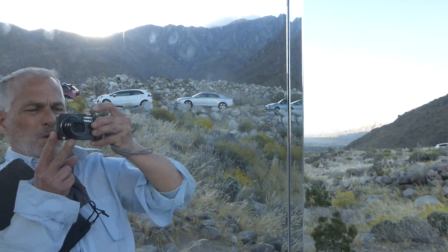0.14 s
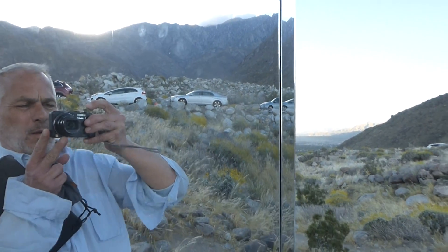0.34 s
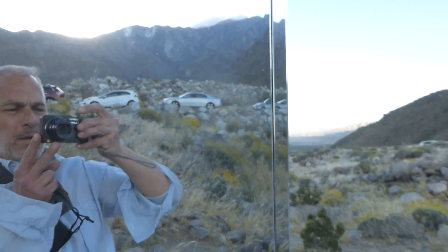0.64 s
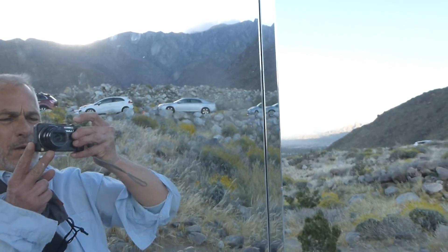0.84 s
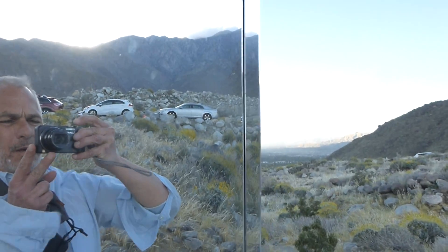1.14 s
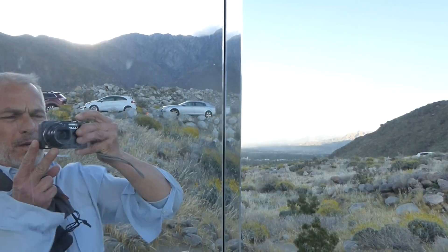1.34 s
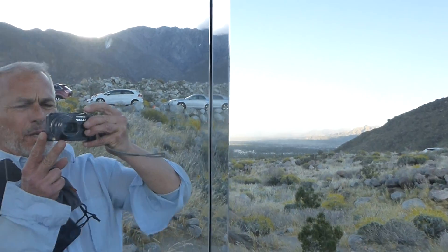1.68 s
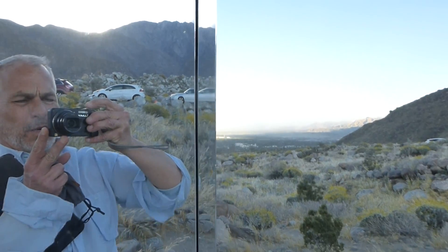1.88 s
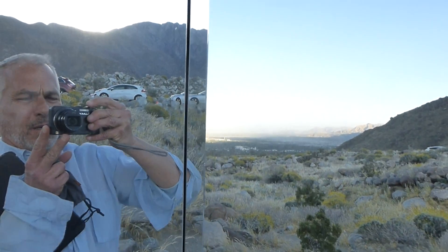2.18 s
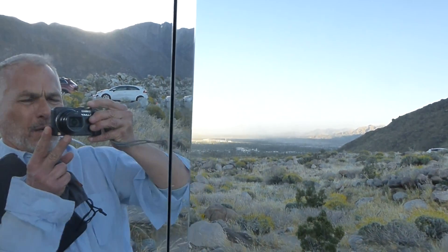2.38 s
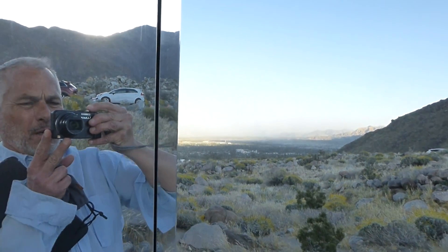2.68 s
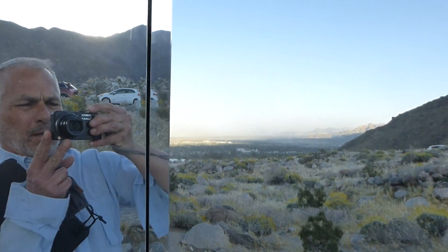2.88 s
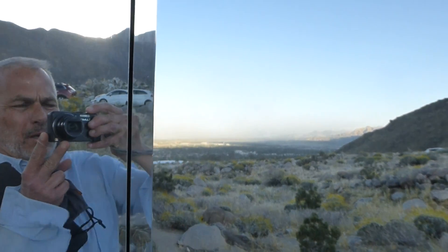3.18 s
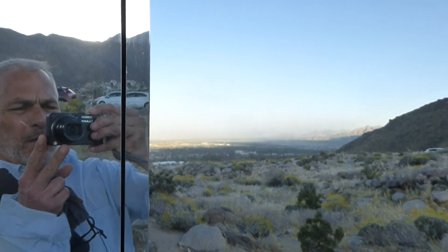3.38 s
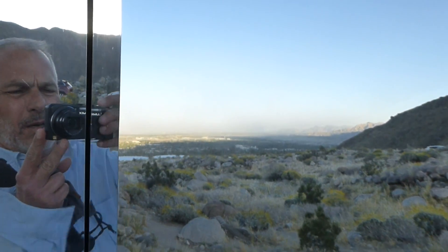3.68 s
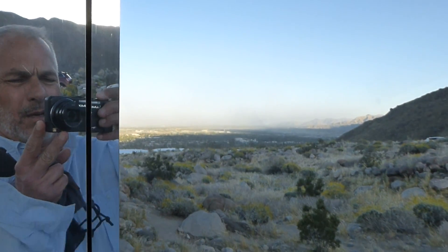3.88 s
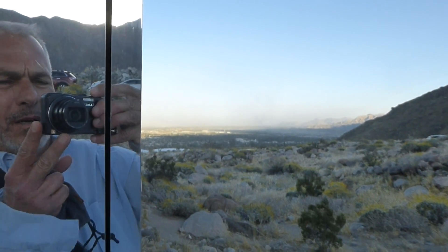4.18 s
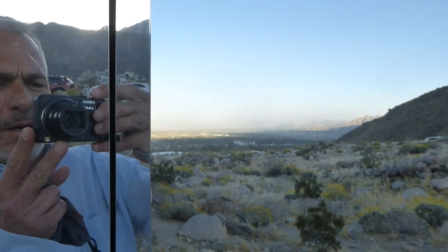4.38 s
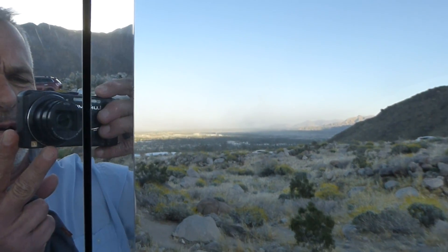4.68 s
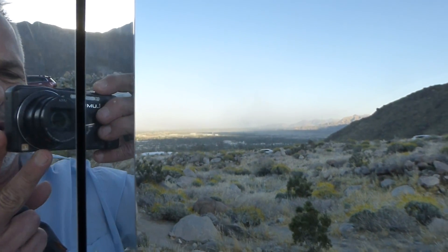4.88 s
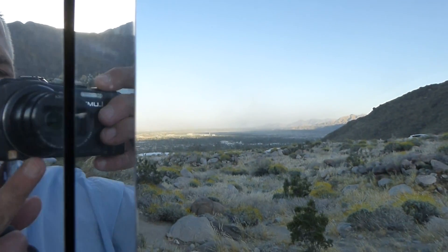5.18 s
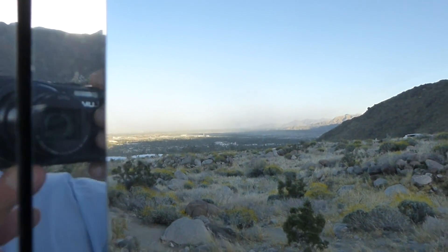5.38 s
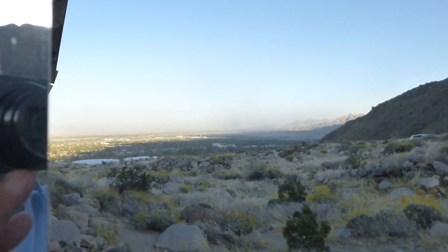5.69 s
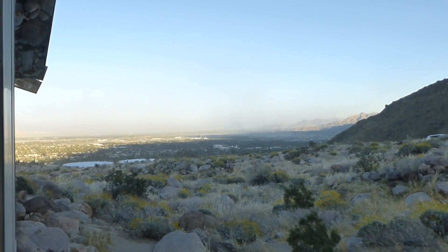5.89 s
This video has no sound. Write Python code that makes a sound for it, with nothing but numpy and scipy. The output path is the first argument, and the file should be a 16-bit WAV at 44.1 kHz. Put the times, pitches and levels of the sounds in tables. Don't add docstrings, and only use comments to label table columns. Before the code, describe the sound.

Strong wind blows over the tiny unshielded microphone of a hand-held camera in open desert hills. A rough continuous roar starts at once, loudest and full, then eases unevenly, turning dull near one second, brighter around one and a half and again past three. Short puffs, gaps and hissy flashes break it up, while low buffeting and dull thumps knock the microphone. Close, dry, no echo.

```python
import sys
import numpy as np
from scipy import signal
from scipy.io import wavfile
from scipy.ndimage import uniform_filter1d

SR = 44100
rng = np.random.default_rng(int(sys.argv[2]) if len(sys.argv) > 2 else 0)


def volts(x):
    e = np.asarray(x, float) / 20
    return 10 ** e


def unload_audio(sound):
    columns = np.transpose(np.atleast_2d(sound))
    steps = np.round(np.clip(columns, -1, 1) * 32767)
    wavfile.write(sys.argv[1], SR, steps.astype(np.int16))


N = 266584

# start_s, strength_db, brightness_db
AIR_STREAM = [(0.0, -21.5, -21), (0.67, -24.0, -27.5), (0.8, -25.5, -34.5), (0.96, -23.5, -25),
              (1.06, -26, -25), (1.49, -27.5, -16.5), (2.4, -24.5, -25.5), (2.59, -29.5, -33.5),
              (2.69, -28.0, -22.5), (3.21, -23.5, -14.5), (3.31, -27.5, -17.5), (3.47, -25.5, -14),
              (4.5, -27.5, -22), (4.6, -28, -33.5), (4.97, -26.5, -34.5), (5.16, -23.5, -23.5),
              (5.83, -29, -34), (6.04, -25.5, -34)]
# centre_s, length_s, strength_lift_db, brightness_lift_db, buffeting_lift_db
SWELLS_AND_LULLS = [(0.197, 0.11, -1.5, -2, -5), (0.358, 0.078, -1.5, -0.5, -2),
                    (1.117, 0.059, -0.5, -9, 3.5), (1.217, 0.04, -5, 1, 3), (1.402, 0.072, -0.5, -3.0, 0.5),
                    (1.46, 0.067, 2, -0.5, -4), (1.632, 0.031, 3.0, 1, -1), (1.844, 0.1, 0, 2, -8.0),
                    (2.09, 0.14, 0.5, -8, 1.5), (2.17, 0.053, -2.5, -1, -3), (2.456, 0.065, -2.5, 5.5, -1),
                    (2.667, 0.075, 5, -6, 4.5), (3.1, 0.032, 2.5, -4, 1.0), (4.002, 0.07, -1, -3, -5),
                    (4.321, 0.045, 0, -7, -1.5), (4.745, 0.12, 2.5, 8.5, -0.5),
                    (4.853, 0.049, 0.5, 6.5, -2.0), (4.914, 0.048, -4.5, -2.5, -6),
                    (5.216, 0.039, -3, 0, -1), (5.497, 0.071, -2.5, -3, -12), (5.647, 0.13, 4.5, 4.5, -5),
                    (5.75, 0.048, 2, -14.5, -4), (5.874, 0.045, -2, -6, -4), (5.926, 0.083, 7.5, -4, 3)]
# centre_s, length_s, strength_lift_db, brightness_lift_db
AIR_PUFFS = [(0.058, 0.03, 2.5, 2), (0.455, 0.03, 2.0, 1), (0.558, 0.02, 3.5, -5.5), (0.838, 0.056, 1.5, 2),
             (0.958, 0.024, 3.5, 4), (1.106, 0.008, 6.5, 3.5), (1.144, 0.0092, 7, 2.5),
             (1.19, 0.012, 6.5, -0.5), (1.245, 0.028, 1, 3.5), (1.356, 0.015, 3.5, 2.5),
             (1.438, 0.011, 5.5, -9), (1.517, 0.0093, 6, -2.5), (1.74, 0.038, 1.5, -3.5),
             (2.048, 0.015, 4.0, -1.0), (2.143, 0.0065, 4.0, -17), (2.32, 0.011, 1.5, -3),
             (2.347, 0.017, 3, 0), (2.39, 0.011, 2.5, -6.0), (2.689, 0.0088, 4.5, -2),
             (2.791, 0.011, 3, 3.5), (3.043, 0.011, 3, -6), (3.45, 0.011, 3.0, -3),
             (3.531, 0.018, 1.5, -3.5), (4.388, 0.036, 2.5, 0.0), (4.52, 0.023, 4, 0.5),
             (4.904, 0.015, 3, 8.0), (5.357, 0.022, -1, 8), (5.552, 0.012, 4.0, -6),
             (5.698, 0.011, 2.5, 2.5), (5.785, 0.028, 2.5, -2.5)]
# centre_s, length_s, strength_lift_db, brightness_lift_db
AIR_GAPS = [(0.138, 0.015, -2.5, 4), (0.674, 0.028, -2.5, 7), (0.709, 0.031, -0.5, -4),
            (0.727, 0.017, -1, 5), (1.123, 0.011, -6.0, 4), (1.376, 0.017, -5, 3.0),
            (1.538, 0.013, -7.5, 1), (1.672, 0.051, 0.0, -4.5), (1.765, 0.0097, -3.0, -5),
            (1.921, 0.018, -3, -0.5), (1.961, 0.02, -2.5, 1), (2.033, 0.031, -0.5, -6.5),
            (2.29, 0.018, -1, -3), (2.402, 0.011, -3.5, -9), (2.674, 0.0087, -1, -3.0),
            (3.183, 0.026, -3, 1), (3.261, 0.017, -3.5, 3), (3.403, 0.02, -1.5, -6), (4.61, 0.011, -3.5, 2),
            (4.658, 0.018, -7.5, 7), (4.96, 0.0096, -5, -3.5), (5.147, 0.011, -2.5, -4.5),
            (5.213, 0.0085, -13, -1.0), (5.377, 0.02, -4, 4), (5.42, 0.011, -1.5, 2.0),
            (5.447, 0.018, -3, 1.5), (5.623, 0.022, -3, 1), (5.723, 0.015, -5.5, 1),
            (5.816, 0.015, -2.5, -6), (5.94, 0.013, -8.5, 0)]
# centre_s, brightness_lift_db
TREBLE_FLASHES = [(0.62, 3), (1.095, 5), (1.165, 6), (1.404, 6), (1.48, 4), (1.976, 5), (2.093, 11),
                  (2.23, 6), (2.512, -6), (2.53, -6), (2.642, 12), (2.666, 9), (2.922, 0), (3.223, 6),
                  (3.841, 7), (4.002, 6), (4.557, -3), (4.633, 3), (4.789, 5), (4.945, -2), (4.979, 2),
                  (5.015, 9), (5.065, 4), (5.183, 8), (5.464, 5), (5.6, 2), (5.803, 6), (5.838, 2),
                  (5.909, 1), (5.962, 9)]
# frequency_hz, level_db (per Hz)
ROAR_SPECTRUM = [(150, 8.5), (300, 1), (600, -1.5), (1100, -1.5), (2000, -3), (3000, -8), (5000, -16.5),
                 (7000, -23.5), (10000, -34), (15000, -47.5), (24000, -80), (44000, -88), (90000, -115)]
# frequency_hz, gain_db
PORT_COLOUR = [(1000, 0), (4000, 0), (5200, 1), (6500, -1), (10000, 0), (15500, 4)]
# frequency_hz,
# level_db (under the roar)
DISTANT_RUSH = [(1500, -29), (3000, -26.5), (4200, -39), (5400, -64), (6500, -51), (9000, -75), (16000, -95)]
# frequency_hz, level_db (per Hz)
BUFFET_SPECTRUM = [(8, -50), (18, -34), (35, -35), (60, -5.5), (113, -2.5), (200, -7.5), (500, -10)]
# centre_s, peak_db, pitch_hz
BIG_THUMPS = [(0.141, -13, 213), (0.396, -15, 198), (0.597, -10, 141), (1.107, -9, 138), (1.147, -5, 175),
              (1.195, -11, 189), (1.367, -3.5, 149), (1.439, -8.5, 111), (1.483, -3, 218),
              (1.515, -13, 184), (1.642, -9, 190), (1.761, -9, 118), (1.902, -13, 188), (1.996, -15, 207),
              (2.143, -5, 247), (2.353, -11, 149), (2.459, -12.5, 171), (2.666, -6.5, 209),
              (2.787, -6.5, 224), (2.873, -11, 150), (3.448, -14, 158), (4.026, -13, 204),
              (4.416, -13, 130), (4.98, -10, 170), (5.112, -8.5, 148), (5.178, -8.5, 260),
              (5.439, -11, 229), (5.7, -14, 191), (5.756, -12.5, 240), (5.959, -14, 202)]

HOP = 64
USUAL_FIZZ_DB, FIZZ_DB_PER_OCTAVE = -22, 17.5


def roar():
    t = np.arange(N // HOP + 8) * HOP / SR
    hz = np.fft.rfftfreq(4 * HOP, 1 / SR)[:, None] + 1
    level_db, speed = wind(t)
    bass_cut_db = 16 * np.log10(1 + (240 / hz) ** 2)
    colour_db = read(ROAR_SPECTRUM, hz / speed) - bass_cut_db
    core = (hz[:, 0] > 400) & (hz[:, 0] < 1800)
    colour_db -= 10 * np.log10((volts(colour_db[core]) ** 2).sum(0))
    distant_power = volts(read(DISTANT_RUSH, hz)) ** 2
    colour_db = 10 * np.log10(volts(colour_db) ** 2 + distant_power)
    uneven_db = 0.47 * patches(colour_db.shape, bins=5, frames=12)
    field_db = colour_db + read(PORT_COLOUR, hz) + level_db + uneven_db
    return volts(0.74) * noise(field_db, size=4 * HOP)


def wind(t):
    s, strength_db, bright_db = np.transpose(AIR_STREAM)
    gusts = lifts(t, SWELLS_AND_LULLS, 1)[:2]
    gusts = gusts + lifts(t, AIR_PUFFS, 1.17) + lifts(t, AIR_GAPS, 1.1)
    strength_lift_db, bright_lift_db = gusts
    shared = flutter(t, 12, 200)
    level_db = np.interp(t, s, strength_db) + strength_lift_db
    level_db = level_db + 0.65 * flutter(t, 7.9, 120) + 0.99 * shared
    fizz_db = np.interp(t, s, bright_db) + bright_lift_db + 0.5 * shared - 1.17
    flashes = [(at, 0.0075, db) for at, db in TREBLE_FLASHES]
    fizz_db = fizz_db + lifts(t, flashes, 0.93)[0]
    snaps = rng.exponential(1, len(t)) * (rng.random(len(t)) < 0.2)
    fizz_db = fizz_db + 4.2 * uniform_filter1d(np.minimum(snaps, 2.4), size=2)
    return level_db, 2 ** ((fizz_db - USUAL_FIZZ_DB) / FIZZ_DB_PER_OCTAVE)


def buffeting():
    hz = np.fft.rfftfreq(2048, 1 / SR)[:, None] + 1
    colour_db = read(BUFFET_SPECTRUM, hz) - 17 * np.log10(1 + (hz / 300) ** 2)
    low = evened(noise(colour_db + np.zeros(N // 512 + 8), size=2048))
    t = np.arange(N) / SR
    s, strength_db, bright_db = np.transpose(AIR_STREAM)
    octaves = (bright_db - USUAL_FIZZ_DB + 1.5) / FIZZ_DB_PER_OCTAVE
    buffet_db = -24.0 + 0.54 * (strength_db + 26) - 5 * octaves ** 2
    slow_t = t[::HOP]
    lumps_db = 2.4 * flutter(slow_t, 8, 60) + 1.36 * lifts(slow_t, SWELLS_AND_LULLS, 0.97)[2]
    return low * volts(np.interp(t, s, buffet_db) + np.interp(t, slow_t, lumps_db) - 3.0)


def thumps():
    out = np.zeros(N + SR)
    when, size, pitch = rng.random(size=(40, 3)).T
    small_s = 0.05 + when * (N / SR - 0.05)
    small_db = -19.0 + 5 * (2 * size - 1)
    small_hz = 90.0 * (260.0 / 90.0) ** pitch
    eddies = [*BIG_THUMPS, *np.transpose([small_s, small_db, small_hz])]
    for (at, peak_db, hz), phase in zip(eddies, rng.random(len(eddies))):
        half = int(1.6 * SR / hz)
        turns = np.arange(-half, half) * hz / SR
        fade = np.exp(-(turns / 0.52) ** 2) * np.hanning(len(turns))
        push = np.cos(2 * np.pi * (turns + phase)) * fade
        start = round(at * SR) - half
        out[start:start + len(push)] += volts(peak_db - 4.0) * push
    return out[:N]


def lifts(t, events, depth):
    at, length, *columns = np.transpose(events)
    bumps = np.exp(-(2 * (t - at[:, None]) / length[:, None]) ** 4)
    return depth * np.array(columns) @ bumps


def flutter(t, low_hz, high_hz):
    hz = np.geomspace(low_hz, high_hz, num=60)[:, None]
    waves = np.sin(2 * np.pi * (hz * t + rng.random(hz.shape)))
    return evened((waves * hz ** -0.15).sum(0))


def patches(shape, bins, frames):
    field = rng.standard_normal(shape[::-1]).T
    field = uniform_filter1d(field, bins, axis=0)
    return evened(uniform_filter1d(field, frames, axis=1))


def noise(field_db, size):
    a, b = rng.standard_normal(field_db.T.shape + (2,)).T
    spectra = volts(field_db) * (a + 1j * b)
    return signal.istft(spectra, nperseg=size, noverlap=size * 3 // 4)[1][:N]


def read(points, hz):
    f, db = np.transpose(points)
    return np.interp(np.log(hz), np.log(f), db)


def evened(x):
    return x / np.sqrt(np.mean(x ** 2) + 1e-20)


def scene():
    return (roar() + buffeting() + thumps())[None]


def top_cut(x):
    return signal.sosfilt(signal.butter(12, 15700, fs=SR, output="sos"), x)


def record(dry):
    return top_cut(dry)


dry = scene()
out = record(dry)
unload_audio(out)
```